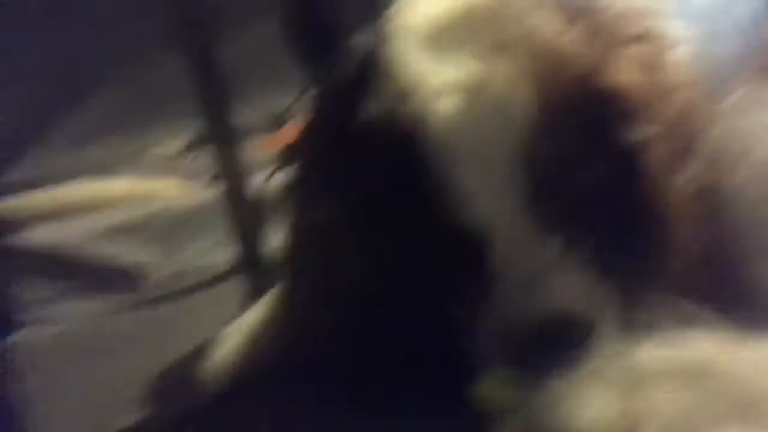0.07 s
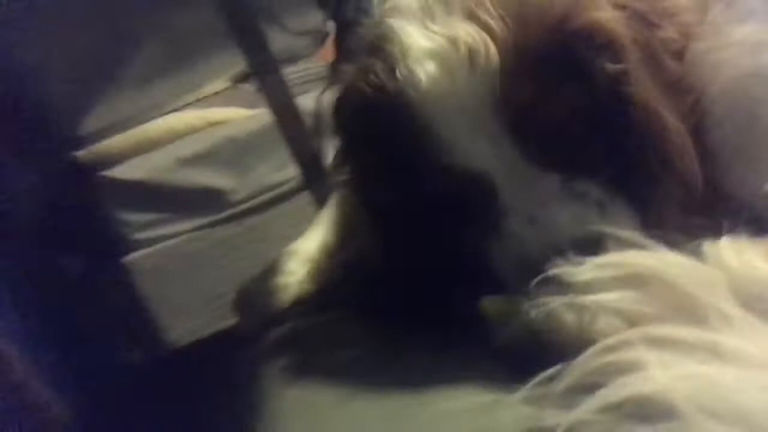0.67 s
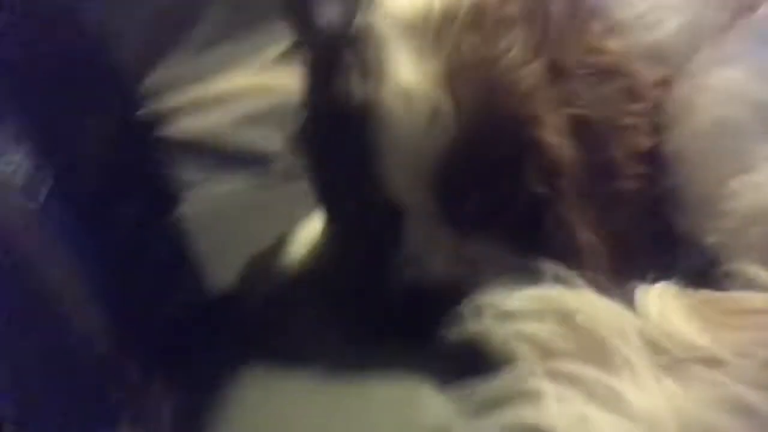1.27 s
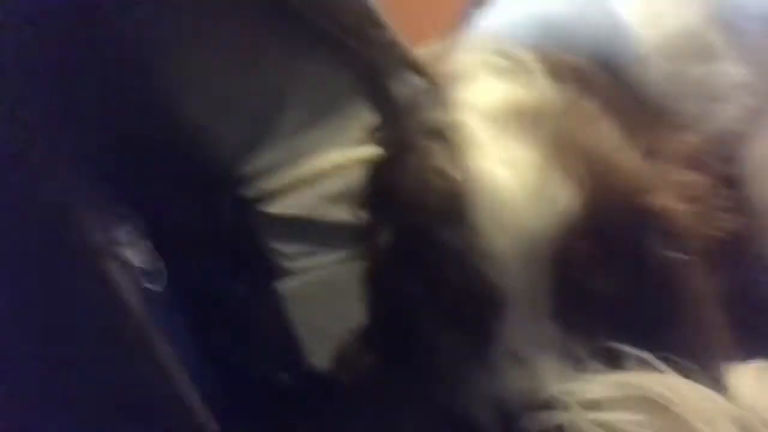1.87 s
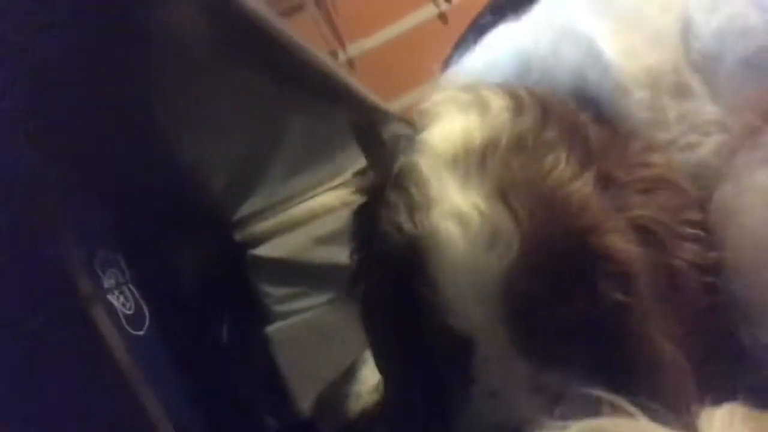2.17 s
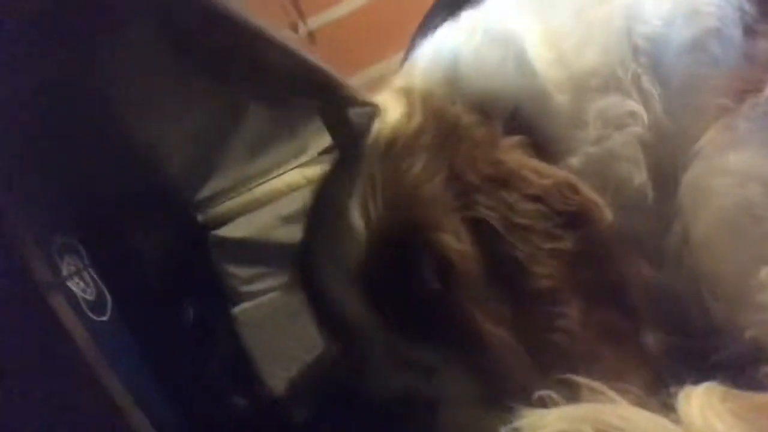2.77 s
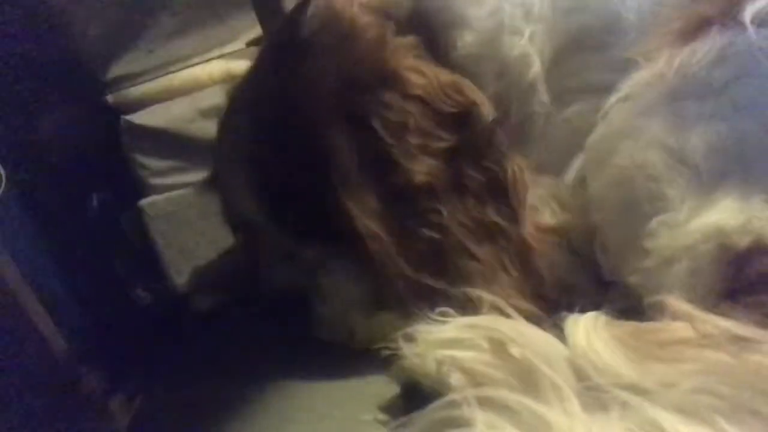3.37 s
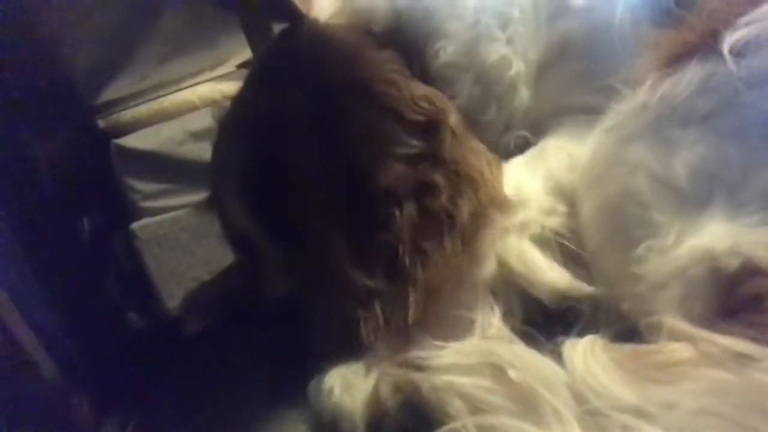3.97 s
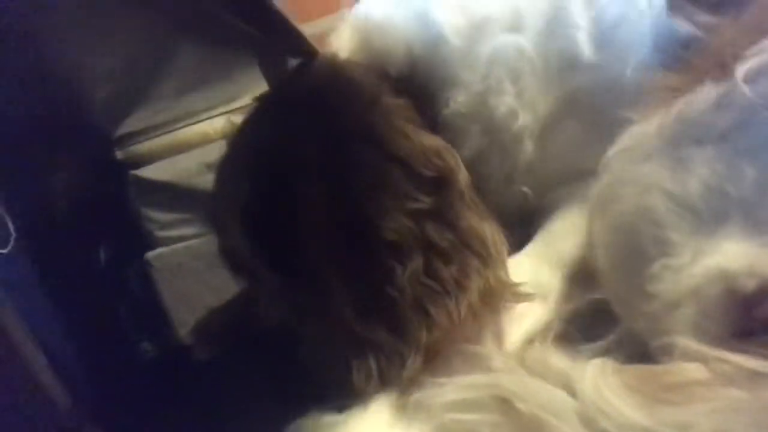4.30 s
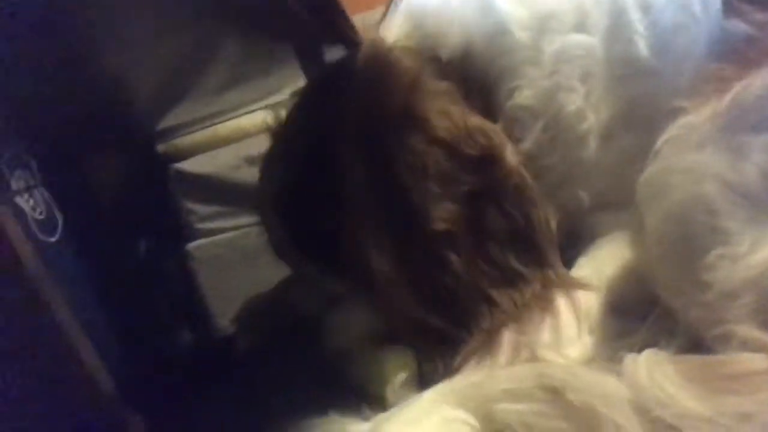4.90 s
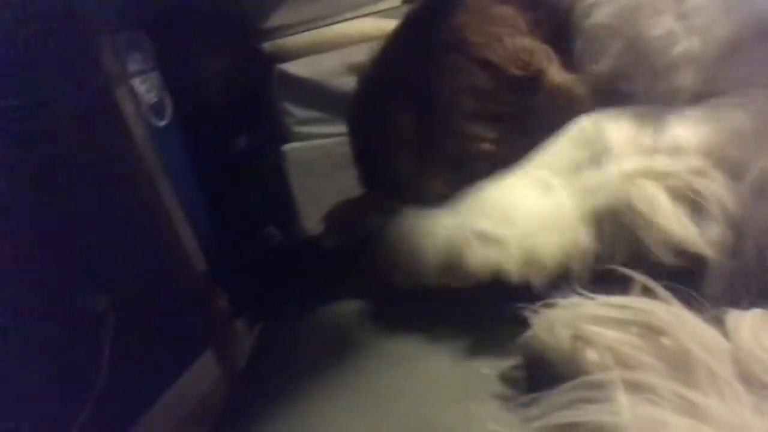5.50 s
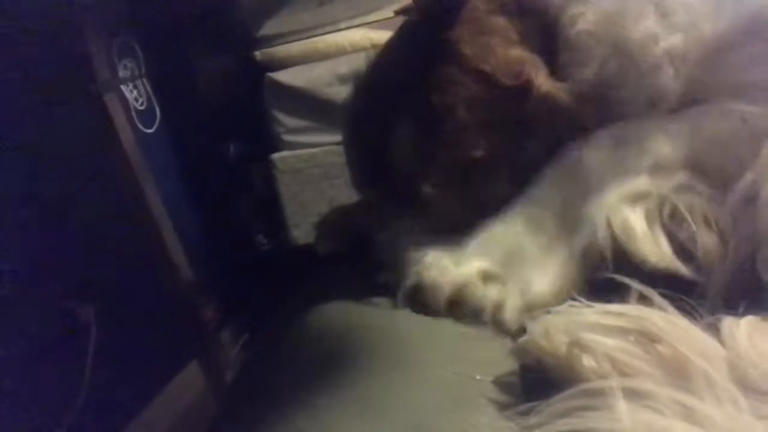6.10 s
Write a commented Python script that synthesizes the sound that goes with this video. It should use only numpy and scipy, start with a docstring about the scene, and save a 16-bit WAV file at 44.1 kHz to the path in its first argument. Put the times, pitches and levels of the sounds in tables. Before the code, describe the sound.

Close knocks, rattles and furry rubbing on a hand-held phone, with a dog's faint lip smacks and licks in between.

```python
"""Soft brushing and a wet smack, then loud knocks: a dog eats a soft sweet beside a hand-held phone. Its lips
and tongue smack, its saliva ticks and fizzes, and its fur drags over the phone. Bumped again and again, the
case knocks; hard hits rattle it, their biggest peaks are rounded off, and they make the recorder hiss a little
more for a moment. The hand adds a low rumble over a quiet room."""
import sys
import numpy as np
from scipy import signal
from scipy.fft import rfft, irfft
from scipy.io import wavfile
from scipy.ndimage import uniform_filter1d

SR = 44100
rng = np.random.default_rng(int(sys.argv[2]) if len(sys.argv) > 2 else 0)


def bounce(signal):
    """Save signal as a 16-bit WAV file at the path given by the first command-line argument."""
    frames = np.transpose(np.atleast_2d(signal))
    limited = np.clip(frames, -1, 1)
    pcm = np.round(limited * 32767).astype(np.int16)
    wavfile.write(sys.argv[1], SR, pcm)


N = 275625
TIME = np.arange(N) / SR

# strokes of fur over the phone:
# (start [s], end [s], drag level [dB], drag pitch [Hz], scratch level [dB], hiss level [dB])
STROKES = [(0, 0.076, -54.5, 1060, -57.5, -63.5), (0.259, 0.283, -43, 1070, -54, -55),
           (0.541, 0.686, -51, 615, -61, -70), (0.683, 0.761, -32, 527, -59, -68),
           (0.918, 1.013, -23.5, 455, -54, -82), (1.272, 1.311, -47.5, 646, -59.5, -67),
           (1.456, 1.49, -43, 352, -81, -78), (2.229, 2.361, -43, 565, -52.5, -67),
           (2.371, 2.418, -50.5, 423, -63, -66), (2.552, 2.612, -48, 450, -61.5, -58.5),
           (2.692, 2.746, -51.5, 990, -59.5, -58.5), (2.768, 3.023, -64, 550, -64, -57.5),
           (2.814, 2.903, -80, 547, -87, -63.5), (3.359, 3.45, -52.5, 414, -62, -73.5),
           (3.595, 3.648, -39.5, 256, -70, -72), (4.241, 4.354, -39, 247, -64.5, -77),
           (4.416, 4.512, -73, 400, -66.5, -70), (5.042, 5.214, -52, 539, -58, -64),
           (5.307, 5.416, -54, 560, -63, -70), (5.406, 5.637, -60.5, 558, -66.5, -76),
           (6.123, 6.203, -63, 604, -72.5, -72)]


def bumps(nudge_hz=79.6, nudge_falloff_db=18, nudge_tuning=0.96):
    """A bump makes the phone ring briefly, favouring the tones near the pitch of the contact."""
    # the phone's own tones: (pitch [Hz], level [dB], rise time [s])
    case_tones = [(62.16, -1, 0.0082), (97.4, -2.5, 0.0035), (184, -0.5, 0.0032), (284.5, -6.5, 0.0016),
                  (393, -2.5, 0.003), (549.8, -11.5, 0.0026), (644, -9.5, 0.003), (792, -8.5, 0.0013),
                  (888.6, -14, 0.0027), (945, -38.5, .016), (977, -11.5, 0.0023), (1110, -12, .0013),
                  (1380, -10.5, .0008), (1790, -19, 0.0009), (2300, -13.5, 0.00043), (3260, -13, 0.00022)]
    # knocks; a hard one has a small falloff, so it wakes many tones; stretch makes them last longer:
    # (time [s], level [dB], contact pitch [Hz], falloff [dB per octave], stretch [x], tuning [x])
    knocks = [(.65, -40.5, 597, 7.5, 1, 1), (.672, 3, 1510, 15.5, 0.82, 1.05),
              (.6729, 9, 496, 31.5, 1.37, 1.034), (.688, -1.5, 570, 14.5, 0.98, 0.9),
              (1.268, -38, 900, 3.5, 1.4, 1.1), (1.3124, -0.5, 1690, 2, 0.95, 0.99),
              (1.3147, -11, 200, 4, 1.7, 1), (1.3231, -7.5, 700, 3.4, 1.62, 1.02),
              (1.3696, -11.5, 950, 16, 0.96, 0.89), (1.3706, -17.5, 180, 2.5, 2.2, 0.893),
              (1.3783, -16, 170, 2, 2.8, .89), (1.3886, -13.5, 308, 7, 1.8, .93),
              (1.3991, -15, 206, 10.5, 1.96, 1.01), (1.4205, -19.5, 230, 15, 1.2, 1.3),
              (1.444, -5.9, 388, 4.5, 0.9, .95), (1.4494, -4, 417, 29, 1.18, 0.99),
              (1.5396, -14.5, 206, 7.5, 1.26, 1.03), (1.9606, -33, 1896, 5.5, 1.16, 1.38),
              (2.0204, -3.5, 60.9, 7.5, 1.07, 1.023), (2.133, -38.5, 477, 12, 1.8, 1.04),
              (2.515, -25.5, 1005, 2, 0.88, 1.11), (2.5552, -21, 137, 12.5, 1.1, 0.94),
              (2.6844, -32, 402, 7, 1.56, 1.02), (2.897, -38, 420, 12, 0.94, 1),
              (2.9423, -40.5, 840, 3.5, 1.9, 0.83), (3.185, -42.5, 450, 12, 1.95, 1.02),
              (3.4161, -20.5, 122.7, 8, 1.5, 1.18), (3.4424, -16.5, 173, 6, 1.37, .96),
              (3.584, -11, 179, 7, 1.06, 1.043), (3.6616, -34, 160, 6, 0.87, 0.94),
              (4.2112, -37.5, 140, 8.5, 1.7, 1.13), (4.2256, -33, 190, 10.5, 1, 1.14),
              (4.4319, -37, 250, 8, 0.78, 1.19), (4.7327, -25.5, 92, 11.5, 1.8, .88),
              (4.7568, -26.5, 504, 21, 0.89, 1.04), (5.0439, -31, 484, 6, 1.8, 0.96),
              (5.919, -15, 61, 10, 1.12, 0.98), (5.9195, -36, 550, 9, 1.28, 1.05),
              (6.157, -39.5, 540, 20, 1.8, 0.94)]
    # soft nudges that only sway the phone: (time [s], level [dB], stretch [x])
    nudges = [(0.426, -29, 0.49), (0.5426, -34, 2.3), (1.0832, -21.5, 0.57), (1.222, -31, 1.3),
              (1.613, -27, 1.9), (2.356, -28, 1.4), (2.694, -30.5, 1.4), (4.65, -27.5, 1.4),
              (4.687, -20, 0.59), (4.755, -35, 0.59), (4.827, -21.5, 1.53), (4.994, -25, 0.79),
              (5.046, -23, 0.98), (5.095, -22, 2.1), (5.183, -25, 1.24), (5.3217, -27.5, 2.9)]
    sways = [(s, db, nudge_hz, nudge_falloff_db, stretch, nudge_tuning) for s, db, stretch in nudges]
    out, t = np.zeros(N), TIME[:SR // 6]
    for s, blow_db, contact_hz, falloff_db, stretch, tuning in [*knocks, *sways]:
        for k, (hz, db, rise_s) in enumerate(case_tones):
            octaves_away = abs(np.log2(hz / contact_hz))
            gain = from_db(db + blow_db - falloff_db * octaves_away)
            # the pressure of the contact damps and detunes all tones together
            ring = swell(t, rise_s * stretch) * np.sin(2 * np.pi * hz * tuning * t)
            add(out, s, (-1) ** k * gain * ring)   # every other tone starts the opposite way
    return out


def rattle(length_s=0.0013, level_db=-7, tail_db=-31, tail_s=0.005):
    """Hard parts of the case tap each other: very short, bright ticks with a faint tail."""
    # taps inside the case: (time [s], level [dB])
    taps = [(0.6741, -35), (1.3137, -23.5), (1.3187, -10.5), (1.3304, -13.5), (1.341, -16.5), (1.3793, -18),
            (1.3894, -11), (1.3988, -17), (1.41, -21), (1.4441, -20.5), (1.9609, -29), (2.517, -30)]
    # tone colour of a tap: (frequency [Hz], level [dB])
    colour = [(1500, -13), (3000, -6.5), (4500, -8), (7000, -1.5), (8200, -6), (9600, -0.5), (11500, -15.5),
              (15000, -18.5)]
    loudness, t = np.zeros(N), TIME[:SR // 20]
    tick = np.exp(-(t / length_s) ** 2) + from_db(tail_db) * np.exp(-t / tail_s)
    for s, db in taps:
        add(loudness, s, from_db(db + level_db) * tick)
    return loudness * noise(colour)


def smacks(rise_cycles=0.61, level_db=2, spray_db=-10):
    """A film of saliva snaps with a little spray, and the mouth rings for a few cycles."""
    # smacks of lips and tongue: (time [s], level [dB], mouth pitch [Hz])
    snaps = [(0.117, -44, 3100), (1.998, -38, 1500), (2.512, -37.5, 1680), (2.546, -39, 1700),
             (2.558, -41.5, 1680), (2.631, -44, 1590), (3.039, -44.5, 1710), (3.058, -44, 1630),
             (3.081, -49.5, 1600), (4.253, -40, 1630), (4.731, -43.5, 1717), (4.757, -45.5, 3005),
             (5.09, -41.5, 1800), (5.174, -39, 1710), (5.304, -38, 1620), (5.32, -37.5, 1700),
             (5.336, -38, 1650), (5.355, -46, 1600), (5.381, -47, 1750), (5.562, -41, 1670),
             (5.769, -45.5, 1500), (5.939, -41, 1830)]
    out, t = np.zeros(N), TIME[:SR // 50]
    for s, db, hz in snaps:
        spray = from_db(spray_db) * rms_one(ring_twice(rng.standard_normal(len(t)), hz, q=0.66))
        snap = swell(t, rise_cycles / hz) * (np.sin(2 * np.pi * hz * t) + spray)
        soft_lips = signal.butter(4, hz * 1.35, fs=SR, output="sos")
        add(out, s, from_db(db + level_db) * signal.sosfilt(soft_lips, snap))
    return out


def fur(edge_s=0.018, q=0.97, cutoff_ratio=1.09, drag_db=2.5, scratch_db=3, hiss_db=1):
    """Hairs catch and slip on the case: each stroke is a hollow drag, a scratch and a fine hiss."""
    # tone colour of the scratch: (frequency [Hz], level [dB])
    scratch_colour = [(300, -11.5), (700, -1), (1050, 4.5), (1450, 1.5), (1800, -3), (2300, -6.5),
                      (3000, -4.5), (4300, -15.5), (8000, -30)]
    # tone colour of the fine hiss: (frequency [Hz], level [dB])
    hiss_colour = [(2000, -6), (4500, -2), (6300, 2.5), (9500, -6.5), (11000, -12), (15000, -14.5)]
    slips = rng.standard_normal(N) * flutter(per_s=300, depth_db=2)
    drag, scratch, hiss = np.zeros((3, N))
    for start, end, drag_level, hz, scratch_level, hiss_level in STROKES:
        span = slice(max(0, int((start - edge_s) * SR)), int((end + edge_s) * SR))
        inside_s = np.minimum(TIME[span] - start, end - TIME[span])
        touch = np.sin(np.pi / 2 * np.clip(0.5 + 0.5 * inside_s / edge_s, 0, 1)) ** 2
        speed = 1 - 0.5 * np.linspace(-1, 1, len(touch)) ** 2   # fastest mid-stroke
        dull = signal.butter(4, hz * cutoff_ratio, fs=SR, output="sos")
        hollow = rms_one(signal.sosfilt(dull, resonance(slips[span], hz, q)))
        drag[span] += from_db(drag_level + drag_db) * touch * speed * hollow
        scratch[span] += from_db(scratch_level + scratch_db) * touch * speed ** 2
        hiss[span] += from_db(hiss_level + hiss_db) * touch * speed
    bright = scratch * noise(scratch_colour) + hiss * noise(hiss_colour)
    return drag + bright * flutter(per_s=120, depth_db=2.5)


def bubbles(fall_s=0.0017, level_db=-8):
    """A lone saliva bubble breaks with a tiny bright tick that dies at once."""
    # bursting bubbles: (time [s], level [dB])
    pops = [(0.1369, -56), (0.3127, -51), (0.3645, -49), (0.5182, -54), (3.025, -42), (3.2987, -42),
            (3.4535, -43), (3.5279, -49), (3.6275, -41), (3.9432, -46), (5.677, -46), (5.7335, -44),
            (5.834, -42.5), (5.9368, -39.5), (6.1572, -43), (6.1732, -36.5)]
    # tone colour of a burst: (frequency [Hz], level [dB])
    colour = [(2500, -7), (4500, -9), (6000, -5), (8500, 6.5), (10000, 0), (12000, -15)]
    loudness, t = np.zeros(N), TIME[:SR // 50]
    for s, db in pops:
        add(loudness, s, from_db(db + level_db) * np.exp(-t / fall_s))
    return loudness * noise(colour)


def saliva(bursts_per_s=450, spread_db=3, q=3.9, level_db=-1):
    """Tiny bubbles burst at random while the tongue moves, so many that they blur into a soft fizz."""
    # licks: (middle time [s], width [s], level [dB])
    licks = [(.346, .065, -87), (2.83, 0.038, -60), (3.13, 0.055, -69.5), (3.403, 0.022, -61),
             (3.617, .013, -63), (3.934, 0.084, -74), (4.461, 0.042, -65.5), (4.928, .04, -72),
             (5.626, 0.042, -66.5), (5.773, 0.027, -67), (5.95, .015, -63.5), (6.19, 0.034, -57.5)]
    licking = sum(from_db(db) * hump(s, width_s) for s, width_s, db in licks)
    bursting = rng.random(N) < bursts_per_s / SR
    bursts = bursting * from_db(spread_db * np.clip(rng.standard_normal(N), -2, 2))
    fizz = sum(ring_twice(bursts * rng.standard_normal(N), hz, q) for hz in (6500, 8200, 9700))
    return from_db(level_db) * licking * rms_one(fizz)


def squelch(hz=1700, q=3.6, level_db=-57):
    """A faint wet rubbing tone swells just before the hardest bump."""
    rubbing = rms_one(ring_twice(rng.standard_normal(N), hz, q))
    return from_db(level_db) * hump(middle_s=1.235, width_s=0.055) * rubbing


def handling(rumble_gain_db=2, rustle_gain_db=-2, press_rumble_db=-30, press_rustle_db=-39):
    """The grip rumbles and the fur rustles, both more while a stroke presses on the phone."""
    # how restless the hand and the dog's coat are: (time [s], rumble level [dB], rustle level [dB])
    unrest = [(0.0, -68.5, -64), (0.59, -50, -65), (0.78, -57.5, -55.5), (1.2, -54, -52),
              (1.48, -42, -62.5), (1.65, -51.5, -58), (2.37, -53.5, -56.5), (2.56, -57, -66),
              (2.77, -55, -49), (3.13, -57, -61.5), (3.52, -50.5, -58), (3.67, -57.5, -70),
              (4.09, -58, -68), (4.33, -50.5, -61), (5.03, -44.5, -62), (5.4, -54, -60), (5.78, -55, -63),
              (6.25, -47.5, -66.5)]
    # tone colour of the shifting grip: (frequency [Hz], level [dB])
    rumble_colour = [(20, -22), (45, 4.5), (80, -4), (120, -3.5), (180, -17), (330, -24), (600, -41.5)]
    # tone colour of the rustling coat: (frequency [Hz], level [dB])
    rustle_colour = [(150, -6), (350, 8), (600, 2.5), (900, -6), (1300, -7.5), (2200, -14.5), (3200, -26.5),
                     (5000, -32)]
    times, *levels = np.transpose(unrest)
    rumble_db, rustle_db = (np.interp(TIME, times, db) for db in levels)
    press_fade_s, drag_share = 0.016, 0.48   # the pressure follows this share of the drag's decibels
    press = np.zeros(N)
    for start, end, drag_db, *_ in STROKES:
        outside_s = np.maximum(0, np.maximum(start - TIME, TIME - end))
        press += from_db(drag_share * drag_db) * np.exp(-(outside_s / press_fade_s) ** 2)
    lumps, brushing = flutter(per_s=25, depth_db=2.5), flutter(per_s=55, depth_db=3.8)
    rumble = np.hypot(from_db(rumble_db + rumble_gain_db), from_db(press_rumble_db) * press)
    rustle = np.hypot(from_db(rustle_db + rustle_gain_db), from_db(press_rustle_db) * press)
    return rumble * noise(rumble_colour) * lumps + rustle * noise(rustle_colour) * brushing


def range_hiss(x, limit=0.44, hold_s=0.415, level_db=-64, fade_s=0.012):
    """A peak over the limit switches the recorder to its loud range, which hisses more for a moment."""
    # tone colour of the loud range's hiss: (frequency [Hz], level [dB])
    colour = [(1500, 2), (3200, 3), (5000, -0.5), (9500, -3), (11000, -8.5), (15500, -4)]
    last_peak_s = np.maximum.accumulate(np.where(np.abs(x) > limit, TIME, -np.inf), axis=-1)
    switched_on = (TIME - last_peak_s < hold_s).astype(float)
    faded = uniform_filter1d(switched_on, int(fade_s * SR) + 1)
    return from_db(level_db) * faded * noise(colour)


def background(room_db=-60, hiss_db=-72.5, whine_db=-75):
    """The quiet room and the microphone's own steady hiss."""
    # tone colour of the room: (frequency [Hz], level [dB])
    room = [(25, -11.5), (60, -4.5), (120, -1.5), (185, -9), (260, -14), (325, -4.5), (450, -14.5),
            (750, -22.5), (1200, -19), (1600, -25), (4800, -36.5), (6800, -33.5), (10700, -47.5),
            (16000, -61)]
    # the microphone's broad hiss: (frequency [Hz], level [dB])
    hiss = [(1500, 1.5), (3200, 5), (4800, -2), (7000, 2), (9500, 0.5), (10800, -13), (15500, -11.5)]
    # its narrow, very high band of hiss: (frequency [Hz], level [dB])
    whine = [(10500, -31), (11500, -4.5), (12200, -5), (13000, -18)]
    return (from_db(room_db) * noise(room) + from_db(hiss_db) * noise(hiss)
            + from_db(whine_db) * noise(whine))


def from_db(db):
    """Turn decibels into a number to multiply by."""
    return 10 ** (np.asarray(db) / 20)


def rms_one(x):
    """Scale a signal so that its average strength (rms) is 1."""
    return x / np.sqrt(np.mean(x ** 2) + 1e-20)


def add(out, s, sound):
    """Mix a sound in, s seconds from the start."""
    at = max(0, int(s * SR))
    out[at:at + len(sound)] += sound[:max(0, N - at)]


def noise(colour):
    """Noise of strength 1 with the given tone colour, fading below and above the listed frequencies."""
    hz, db = np.transpose(colour)
    f = np.arange(N // 2 + 1) * SR / N + 0.0008   # never exactly zero
    edges = 1 / np.sqrt((1 + (hz[0] / f / 2) ** 6) * (1 + (f / hz[-1] / 2) ** 6))
    gain = from_db(np.interp(np.log(f), np.log(hz), db)) * edges
    return rms_one(irfft(rfft(rng.standard_normal(N)) * gain, N))


def flutter(per_s, depth_db):
    """A loudness that wanders at random, per_s times a second."""
    points = rng.standard_normal(8000)
    return rms_one(from_db(depth_db * np.interp(TIME * per_s, np.arange(len(points)), points)))


def resonance(x, hz, q):
    """Keep the sound near one pitch; a higher q keeps a narrower band."""
    return signal.lfilter(*signal.iirpeak(hz, q, fs=SR), x + 1e-18)


def ring_twice(x, hz, q):
    """The same resonance twice over, for a clearer pitch."""
    return resonance(resonance(x, hz, q), hz, q)


def swell(t, peak_s):
    """A curve that rises to 1 at peak_s, then dies away."""
    return t / peak_s * np.exp(1 - t / peak_s)


def hump(middle_s, width_s):
    """A smooth, bell-shaped rise and fall."""
    return np.exp(-0.5 * ((TIME - middle_s) / width_s) ** 2)


def scene():
    """The dog and the hand are right next to one microphone, so there is no echo."""
    return (bumps() + rattle() + smacks() + saliva() + bubbles() + squelch()
            + fur() + handling() + background())[None]


def record(dry, low_cut_hz=33, high_cut_hz=16700):
    """The phone loses the deepest bass and the highest treble; the biggest peaks of hard knocks are rounded
    off, and those knocks add hiss."""
    low_cut = signal.butter(3, low_cut_hz, "high", fs=SR, output="sos")
    high_cut = signal.cheby2(16, 70, high_cut_hz, fs=SR, output="sos")
    thinned = signal.sosfilt(low_cut, dry)
    rounded = thinned / (1 + thinned ** 6) ** (1 / 6)   # rounds off the biggest peaks
    return signal.sosfilt(high_cut, rounded + range_hiss(thinned))


dry = scene()
out = record(dry)
bounce(out)
```